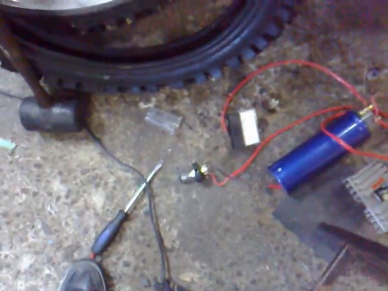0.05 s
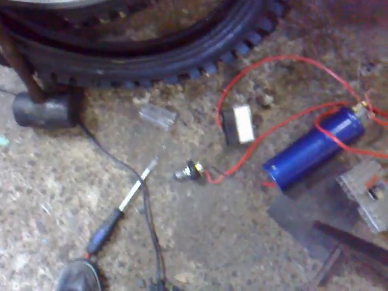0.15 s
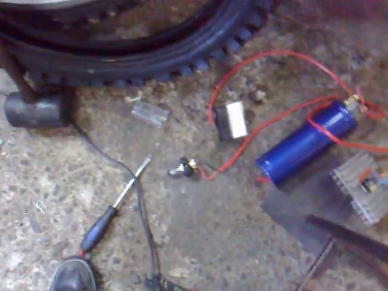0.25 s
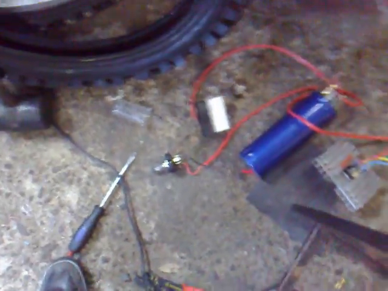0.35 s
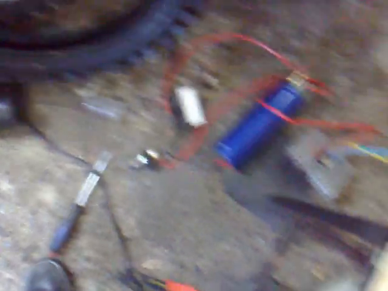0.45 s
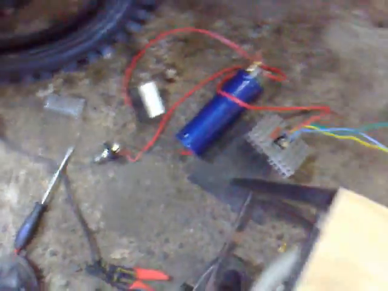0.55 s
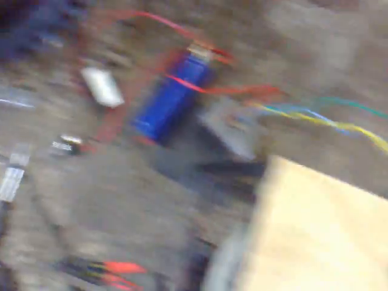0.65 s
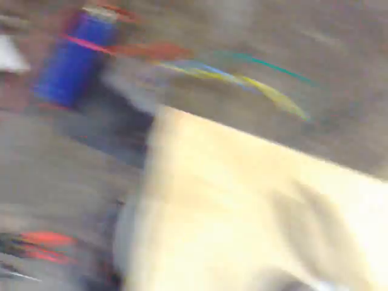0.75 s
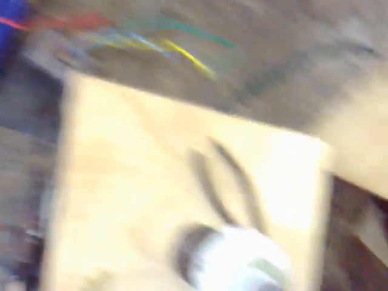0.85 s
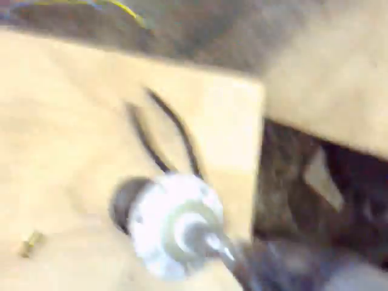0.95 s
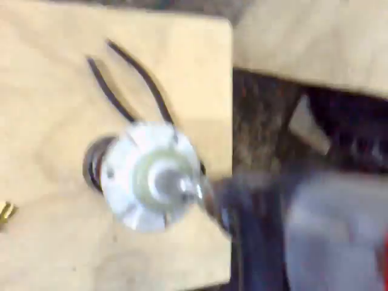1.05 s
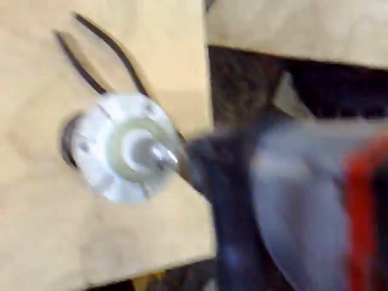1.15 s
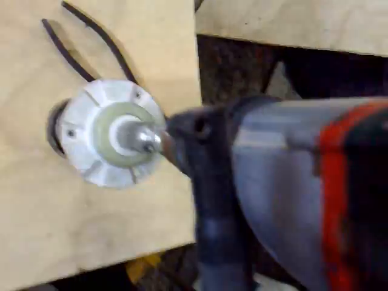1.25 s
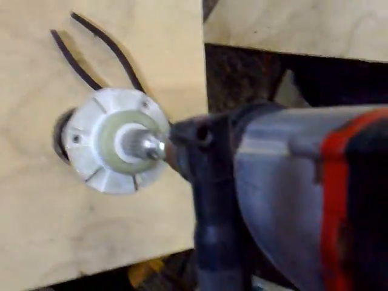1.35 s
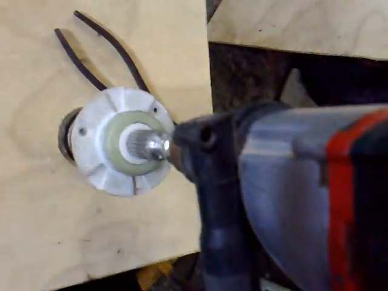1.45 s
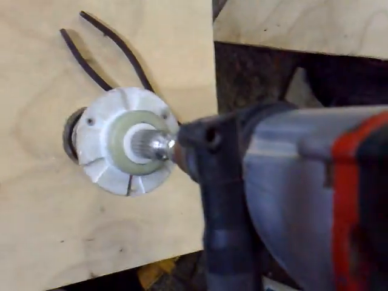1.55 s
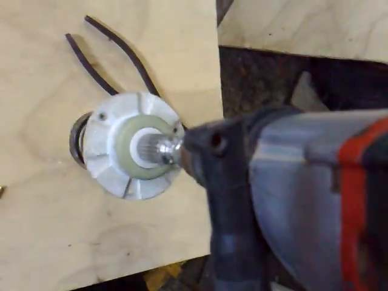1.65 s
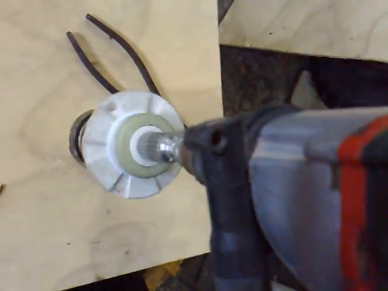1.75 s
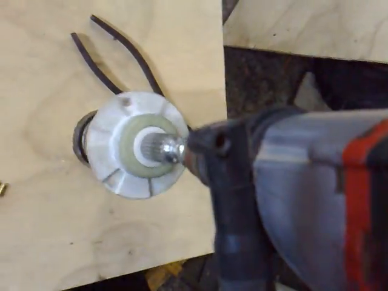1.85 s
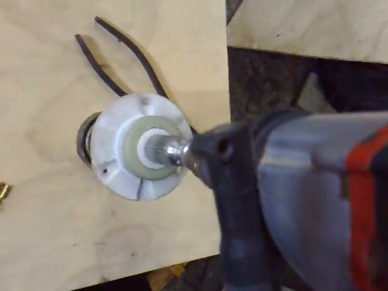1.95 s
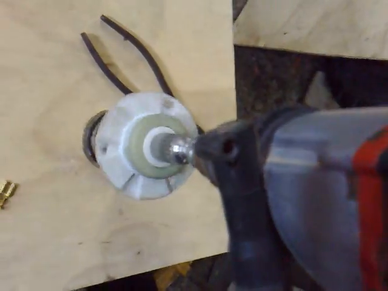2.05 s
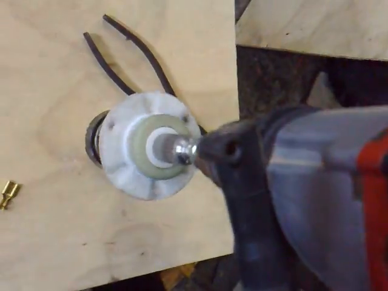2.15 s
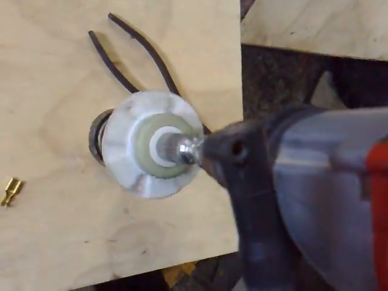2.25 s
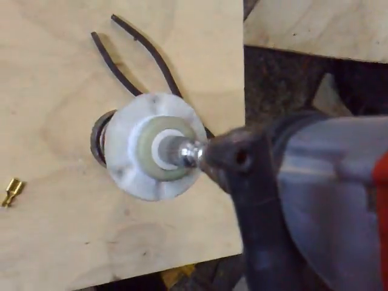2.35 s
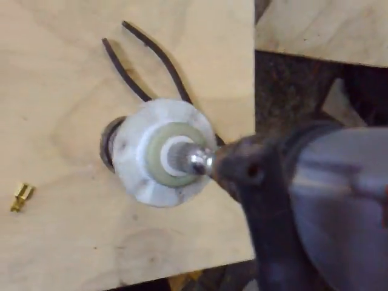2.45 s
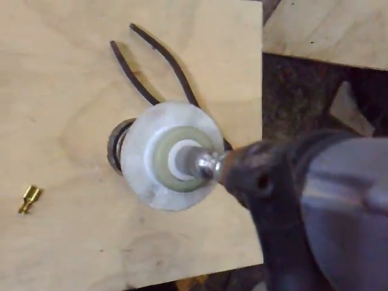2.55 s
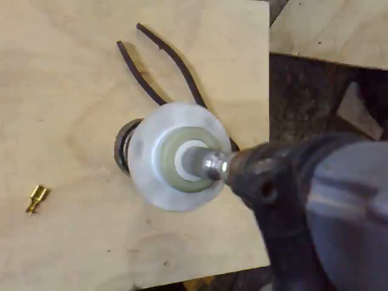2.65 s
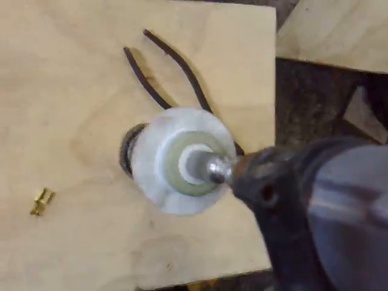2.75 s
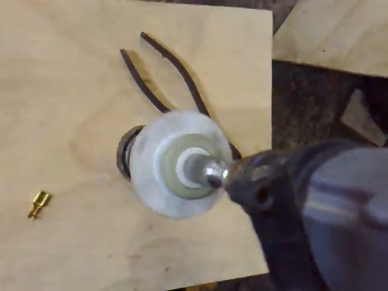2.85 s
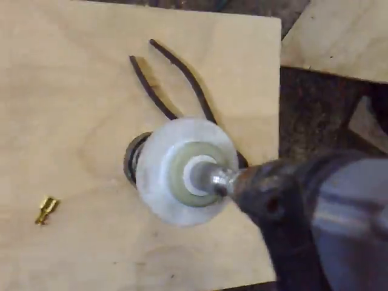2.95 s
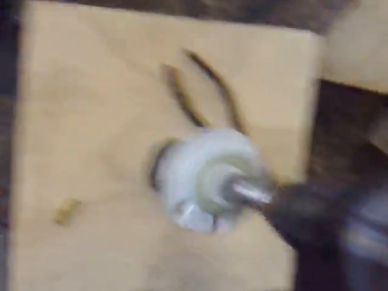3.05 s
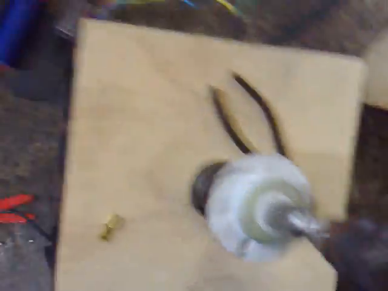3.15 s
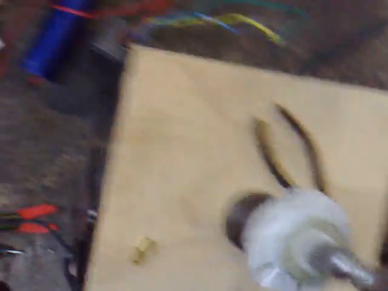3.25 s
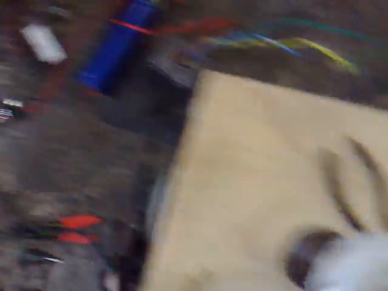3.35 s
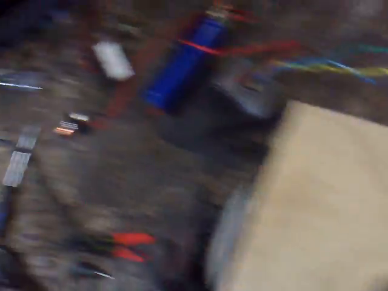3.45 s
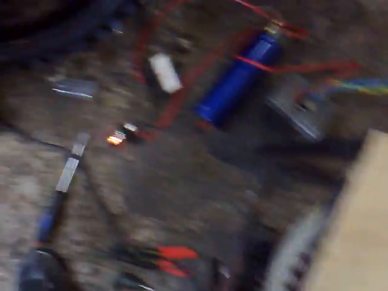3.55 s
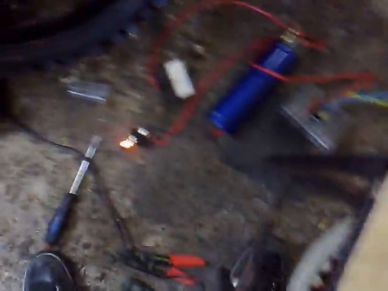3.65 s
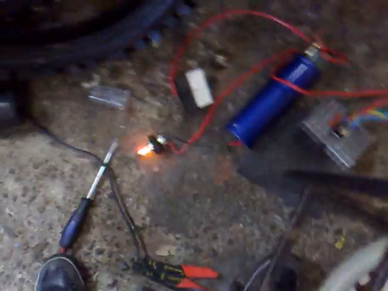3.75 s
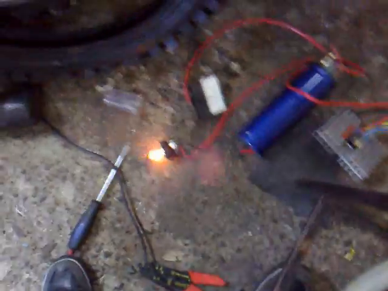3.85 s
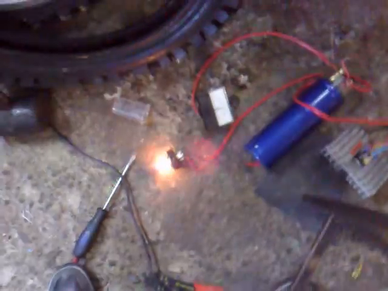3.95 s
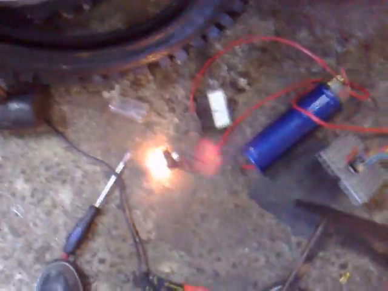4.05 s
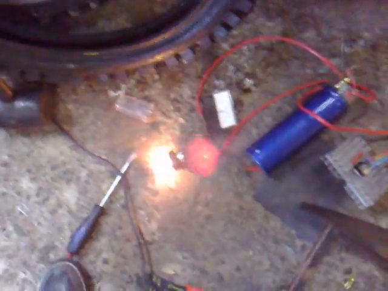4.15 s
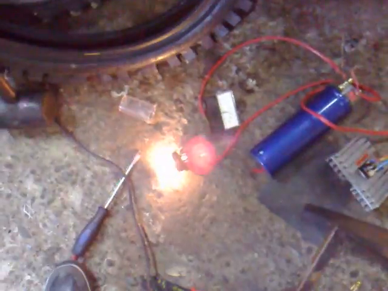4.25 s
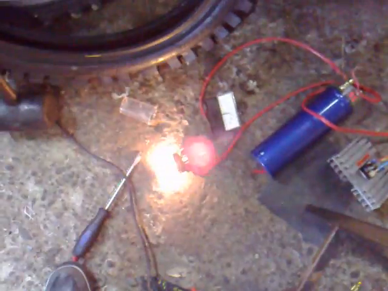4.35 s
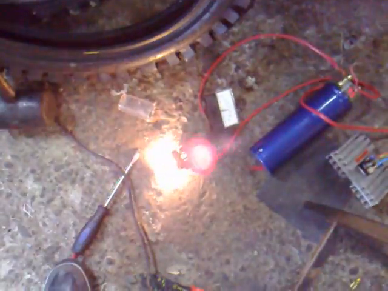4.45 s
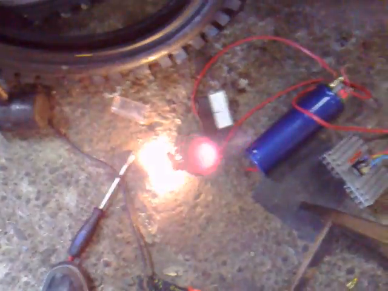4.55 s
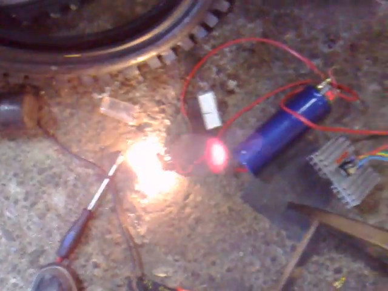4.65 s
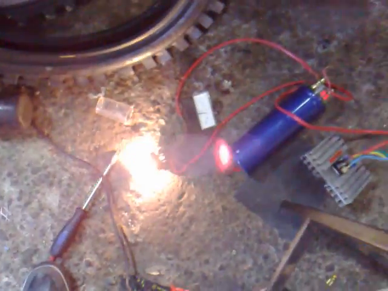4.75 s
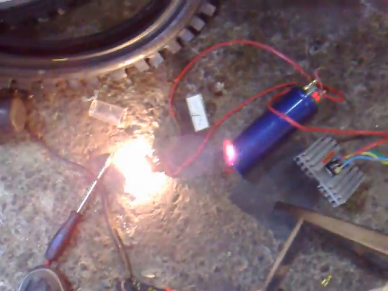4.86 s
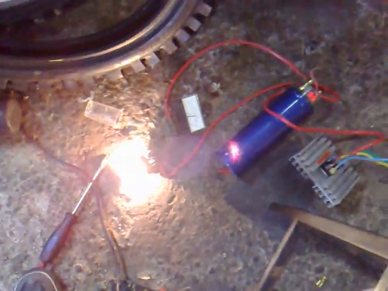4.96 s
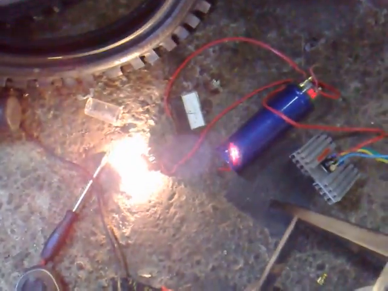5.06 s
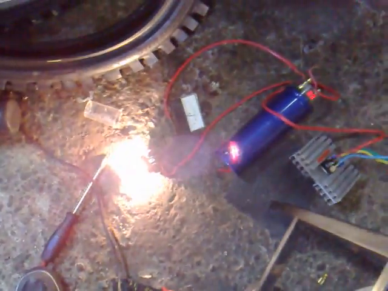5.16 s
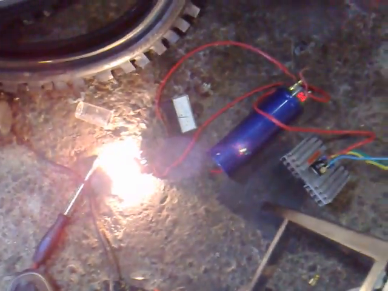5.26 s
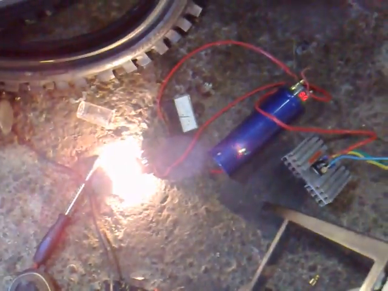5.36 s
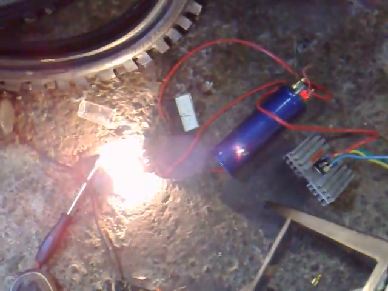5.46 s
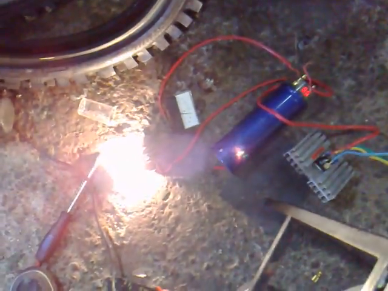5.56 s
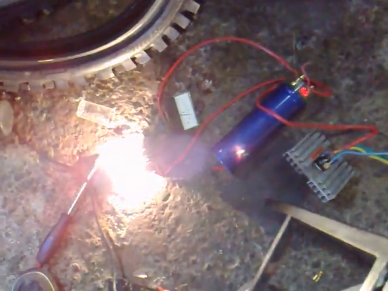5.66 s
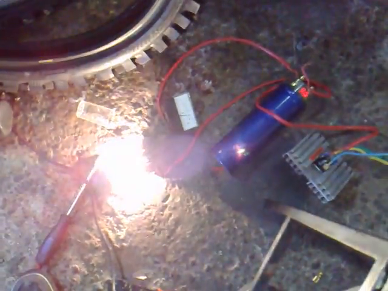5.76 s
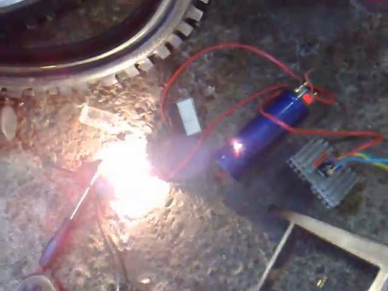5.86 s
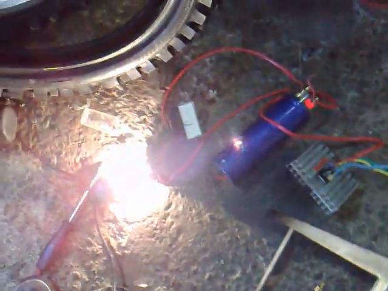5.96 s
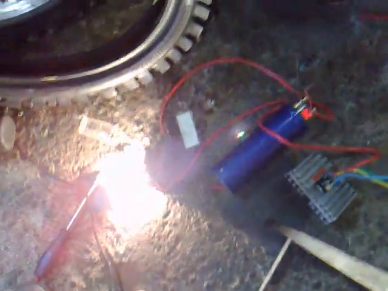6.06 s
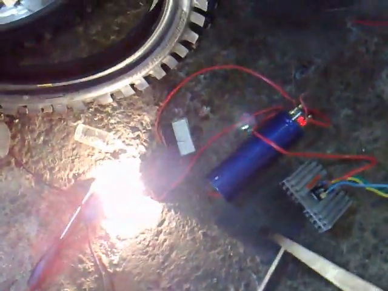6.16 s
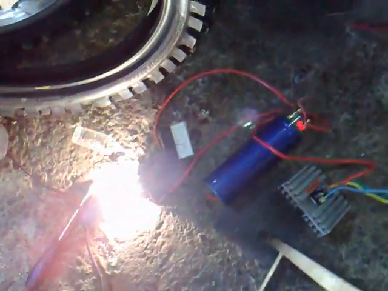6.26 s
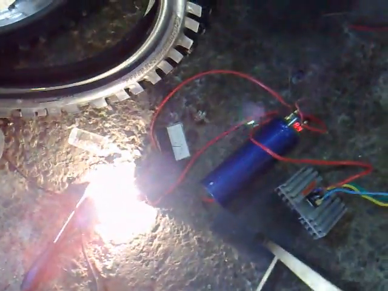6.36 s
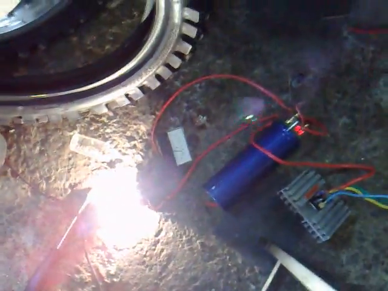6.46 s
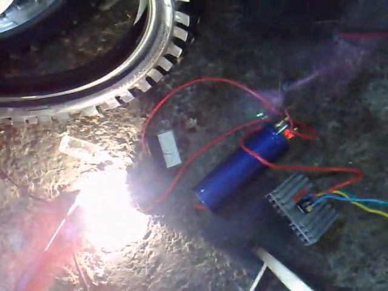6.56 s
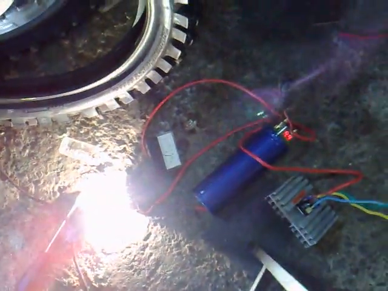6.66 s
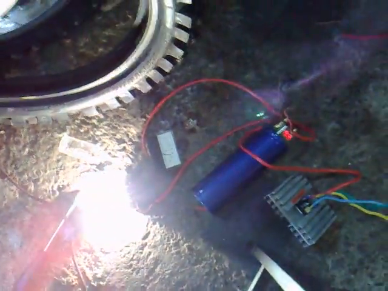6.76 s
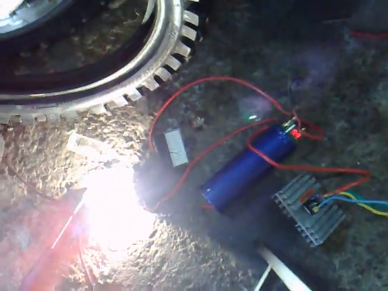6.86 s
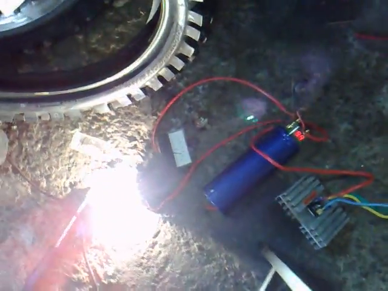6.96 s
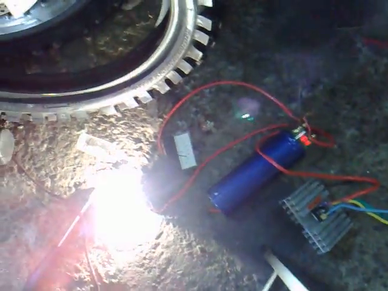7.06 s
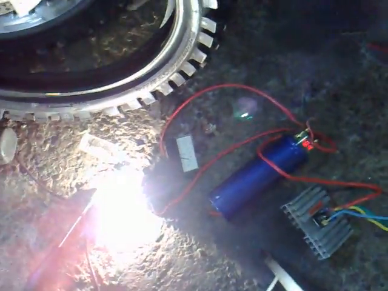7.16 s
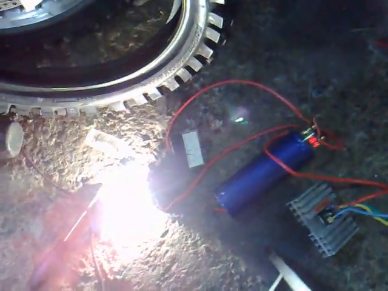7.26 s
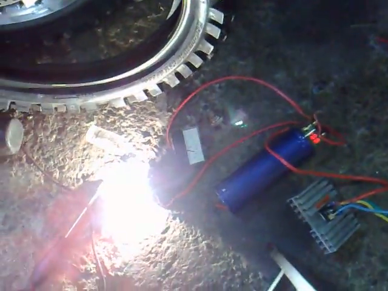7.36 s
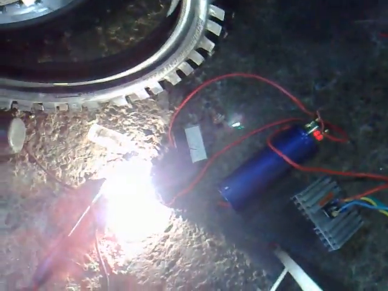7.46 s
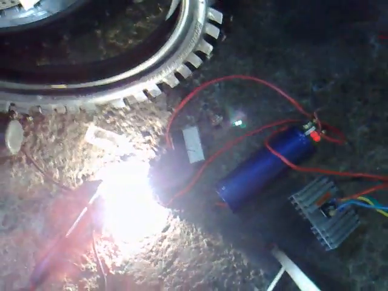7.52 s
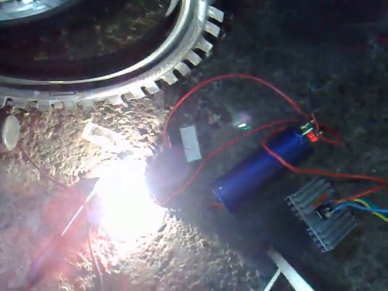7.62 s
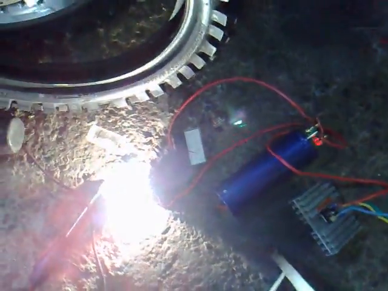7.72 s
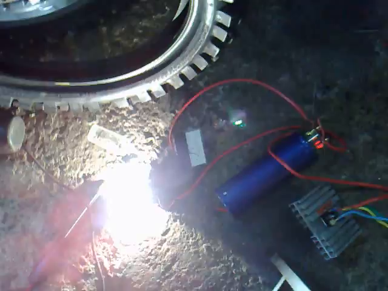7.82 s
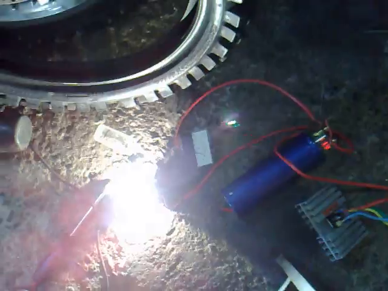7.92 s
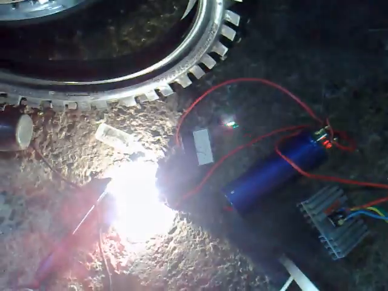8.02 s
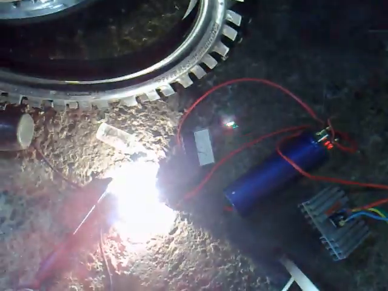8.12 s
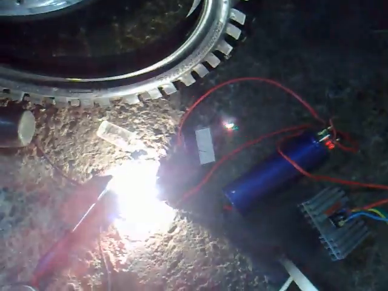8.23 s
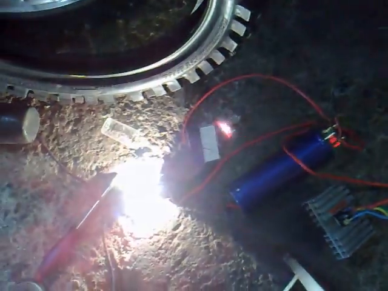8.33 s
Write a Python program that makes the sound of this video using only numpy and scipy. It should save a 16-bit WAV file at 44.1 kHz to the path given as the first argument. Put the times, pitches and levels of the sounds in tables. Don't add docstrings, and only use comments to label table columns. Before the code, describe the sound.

Quiet workshop noise and faint low handling rumble open the scene. From about 0.4 s a stalled mains drill gives a brief buzz, then from 0.5 s a dense rattle of ticks, about a hundred a second in uneven strong and weak pairs, over electrical hum, growing brighter until a tiny gap near 1.35 s. At 1.6 s the rotor breaks loose: a rough, throbbing grind, with irregular hard gear knocks until 2.6 s. Around 2.5 to 3 s it surges into a loud, bright, close gear whine. From 3.3 to 3.7 s, after a dull grip thump, the microphone turns away and the noise falls back and thins. The whine steps up slightly near 3.5 and 4.5 s, then climbs clearly at 5.5 s to a steady, piercing pitch with small wavering dips and mains-rate roughness. Near 7.9 s it starts falling, ending still running at 8.4 s.

```python
import sys
import numpy as np
from scipy import signal
from scipy.fft import rfft, irfft, next_fast_len
from scipy.io import wavfile
from scipy.ndimage import uniform_filter1d

SR = 44100
rng = np.random.default_rng(int(sys.argv[2]) if len(sys.argv) > 2 else 0)


def attenuation_scalar(level_db):
    decades = np.asarray(level_db, float) / 20
    return 10 ** decades


def log_audio(samples):
    frames = np.atleast_2d(samples).T
    limited = np.clip(frames, -1, 1)
    pcm = np.round(limited * 32767).astype(np.int16)
    wavfile.write(sys.argv[1], SR, pcm)


N = 369999
TIME = np.arange(N) / SR

MAINS_HZ, STRONG_KICK_S = 50.13, 1.4025
TURN_AWAY_S = 3.31, 3.7
ROOM_DB, RUMBLE_DB = -63, -62
GRIP_NEAR_DB, GRIP_AWAY_DB = -36.5, -49
BODY_DB, BODY_SINKS, BODY_LEAST_DB = -7, 0.53, -8
BUZZ_DB, BUZZ_FOLLOWS, STALL_ENDS_S = -45, 0.34, 1.63
WEAK_SPREAD_DB, PAUSE_DB = 2.0, -6
ROTOR_LAG_S, BIND_S = .155, .06
TEETH_PER_CHUCK_TURN = 33
CRAWL_ENDS_HZ = 400
EFFORT_DB, CURRENT_LAG_S = 80, .5
TOOTH_LOAD_DB = 3
COWL_HZ, COWL_WIDTH_HZ, COWL_LIFT_DB = 11500, 1500, 12

# (frequency [Hz], density [dB per Hz])
ROOM = [(15, -35), (25, -27), (45, -10), (70, -23), (84, -21), (108, 2.5), (161, -5), (206, 0), (223, -15),
        (363, -30), (503, -11), (714, -14.5), (16000, -31)]
# (frequency [Hz], density [dB per Hz])
RUMBLE = [(15, -42), (25, 1), (70, -7.5), (97, 3.5), (124, -6.5), (279, -5), (400, -17), (520, -7),
          (880, -120)]
# (time [s], peak [dB])
THUMPS = [(0.578, -41), (3.209, -36), (4.439, -35), (5.561, -40), (6.149, -42), (6.849, -36)]
# (time [s], tick above 7 kHz [dB], weak half-wave [dB], fifth hum line [dB])
STALL = [(.2, -75, 3, -90), (.24, -77, -6, -60), (.44, -50, -11, -54), (.52, -47.5, -9, -41.5),
         (.63, -45.5, -38, -40.5), (.8, -38.5, -10.5, -42), (1.03, -34.5, -21, -54),
         (1.09, -33.5, -10, -56), (1.53, -24.5, -9, -46.5)]
# (start [s], end [s])
TRIGGER_HELD = [
    (.368, .452),
    (.498, 1.338),
    (1.378, 1.53),
]
# (frequency [Hz], density [dB per Hz])
TICK = [(1500, -32), (2600, -27.5), (3300, -18), (7200, -23), (8300, -18.5), (13000, -15), (14000, -23),
        (16000, -28)]
# (frequency [Hz], width [Hz], gain [dB])
TICK_RINGS = [(4400, 800, 6), (10000, 700, 5), (12800, 600, 3)]
# (multiple of mains [1], level [dB])
HUM = [(2, -68), (4, -56.5), (6, -67.5), (8, -57), (12, -52), (14, -55.5), (16, -67), (18, -62),
       (20, -58.5)]
# (time [s], gain [dB])
HUM_STAYS = [(1.6, 4.5), (2.9, 1), (3.6, -16), (8.39, -8)]
# (frequency [Hz], density [dB per Hz])
BUZZ = [(250, -30), (450, -3), (600, -3), (1130, -13), (2000, -11), (3500, -9), (5000, -13), (6500, -20),
        (16000, -24)]
# (frequency [Hz], width [Hz], gain [dB])
BUZZ_RINGS = [(2000, 200, 6), (3000, 400, 5), (4500, 600, 6)]
# (time [s], extra path [ms], level [dB])
BENCH_ECHO = [(.6, .78, -12), (1.0, .68, -12), (1.1, .707, -7), (1.55, .707, -7), (1.6, .98, -14),
              (2.4, .98, -18), (2.6, .563, -8), (3.3, .563, -8), (3.7, .64, -22)]
# (time [s], level in 1-3 kHz [dB])
GRIND = [(1.56, -46), (1.6, -32), (1.69, -19.5), (2.04, -19), (2.15, -16), (2.38, -11.5), (2.48, -16),
         (2.75, -9), (2.95, -12.5), (3.57, -15.5), (3.66, -19), (4.5, -19.5), (4.66, -18.5), (5.36, -19),
         (5.61, -19), (7.5, -20), (7.95, -21.5), (8.39, -19.5)]
# (frequency [Hz], density [dB per Hz])
NEAR = [(150, -60), (250, -30), (480, -11.5), (640, -15), (1120, -5), (2000, -2), (4000, -4), (6000, -7),
        (8400, -18), (11000, -18), (13000, -23.5), (16000, -32)]
# (frequency [Hz], density [dB per Hz])
AWAY = [(150, -40), (250, -29.5), (520, -18), (620, -8), (1100, -8.5), (2000, 2), (4500, -2.5),
        (6500, -4.5), (9000, -6), (11500, -4.5), (13500, -13), (16000, -21)]
# (frequency [Hz], width [Hz], gain [dB])
NEAR_RINGS = [(1500, 250, 3), (2000, 250, 5), (2450, 250, -7), (3150, 350, 4), (3650, 300, -5),
              (4100, 400, 6), (4700, 300, -2), (5300, 600, 4), (6500, 400, -3), (7000, 400, 2),
              (10650, 600, 3)]
# (frequency [Hz], width [Hz], gain [dB])
AWAY_RINGS = [(2050, 250, 5), (2450, 250, -3), (3550, 300, -3), (4050, 350, 4), (4750, 300, 5),
              (6700, 400, -3), (10200, 700, 3)]
# (tooth rate [Hz], under 1 kHz [dB], 3-7 kHz [dB], over 7 kHz [dB])
NEAR_TILT = [(130, -11.5, -6.5, -18), (300, -11.5, -1, -9), (432, -18.5, -2, -4.5), (790, -26, 3, -0.5)]
# (tooth rate [Hz], under 1 kHz [dB], 3-7 kHz [dB], over 7 kHz [dB])
AWAY_TILT = [(750, -12, 2, -6.5), (844, -14, 2, -4), (1054, -13.5, 3, -3), (1530, -13, 1, -1.5)]
# (tooth rate [Hz], share [0-1])
THROB = [(130, .8), (220, .6), (290, .35), (600, .08), (750, .13)]
# (time [s], tooth rate [Hz])
TRIGGER = [(1.588, 116), (2.104, 300), (2.536, 281), (2.852, 742), (3.464, 790), (3.526, 933), (4.04, 975),
           (4.376, 955), (4.542, 1042), (5.074, 994), (5.134, 1061), (5.346, 1057), (5.472, 1471),
           (6.564, 1445), (7.256, 1369), (7.318, 1422), (7.85, 1437), (7.93, 713)]
# (time [s], sag [Hz])
BINDS = [(3.808, 24), (5.64, 16), (6.248, 33), (6.448, 14), (7.04, 15), (7.568, 18)]
# (tooth rate [Hz], rotor tones [dB], cowl whine [dB])
NEAR_WHINE = [(400, -65, -70), (704, -43, -45), (720, -67, -31.5)]
# (tooth rate [Hz], rotor tones [dB], cowl whine [dB])
AWAY_WHINE = [(800, -52, -55), (920, -44, -38), (1040, -40, -39), (1200, -38, -40), (1430, -33, -33.5)]
# (multiple [1], level [dB], extra heard close [dB], flicker [dB])
MESH = [(1, -31, -9, 2.0), (2, -32.5, 13, 2.2), (3, -41, 2, 2.5), (1.422, -36.5, -1, 3.0),
        (.422, -41, -8, 1.5)]
# (tooth rate [Hz], gain [dB])
MESH_GROWS = [(130, -28.5), (320, -22.5), (410, -11), (480, -2.5), (1430, 1)]
# (frequency [Hz], width [Hz], gain [dB])
MESH_RINGS = [(333, 166, -24), (596, 40, 5), (814, 200, -1.5), (967, 100, -10.5), (1012, 46, 7.5),
              (1410, 67, 3), (2057, 140, 3.5), (2370, 215, -2), (2590, 460, 4.5), (4370, 520, 8.5)]
# (multiple of tooth rate [1], level [dB])
CRAWL_TONES = [(1.29, -52), (1.61, -51), (2.11, -49), (2.31, -49)]
# (multiple of tooth rate [1], level re rotor tones [dB])
SIDE_TONES = [(.578, -10), (.844, -13), (1.333, -5), (4.0, -8), (4.52, -6), (5.0, -4), (5.52, -7),
              (.333, -20.5), (.5, -17.5), (.667, -17)]
# (multiple of tooth rate [1], level re cowl whine [dB])
UPPER = [(6, -7), (7, -6), (8, 0), (9, -2), (10, -3), (11.1, -4), (12, 0), (15.8, 0)]
# (time [s], peak [dB])
KNOCKS = [(1.623, -16), (1.704, -10), (1.75, -16), (1.7714, -9), (1.8036, -9), (1.8227, -5), (1.8427, -6),
          (1.8632, -9), (1.8885, -2), (1.9221, -0.5), (1.9653, -4), (1.984, -11), (2.0034, -17),
          (2.0204, -6.5), (2.041, -5), (2.0644, -4), (2.089, -12), (2.122, -12), (2.134, -6), (2.151, -8),
          (2.161, -5), (2.171, -0.5), (2.2, -3), (2.2588, 0.5), (2.2988, 0), (2.3384, -3), (2.4487, 0),
          (2.516, -5), (2.5637, 0), (2.605, -3)]


def rms_one(x):
    return x / np.sqrt(np.mean(x ** 2) + 1e-20)


def in_time(rows):
    s, *columns = np.transpose(rows)
    return [np.interp(TIME, s, column) for column in columns]


def turned():
    return np.interp(TIME, TURN_AWAY_S, [0, 1])


def drift(rate):
    r = np.exp(-16 * np.pi * rate / SR)
    white = rng.standard_normal(N // 8 + 6002)
    slow = signal.lfilter([1], [1, -2 * r, r * r], white)[6000:]
    return np.interp(np.arange(N) / 8, np.arange(len(slow)), rms_one(slow))


def resonance(hz, rings):
    return sum(db / (1 + (2 * (hz - ring_hz) / width) ** 2) for ring_hz, width, db in rings)


def colour(x, spectrum, rings=(), band=(0, 1e6)):
    size = next_fast_len(N)
    hz = np.arange(size // 2 + 1) * SR / size + 1
    curve_hz, curve_db = np.transpose(spectrum)
    db = np.interp(np.log(hz), np.log(curve_hz), curve_db) + resonance(hz, rings)
    keep = 1 / np.sqrt((1 + (band[0] / hz) ** 10) * (1 + (hz / band[1]) ** 10))
    return rms_one(irfft(rfft(x, size) * attenuation_scalar(db) * keep, size)[:N])


def bursts(strikes, rise_s, fall_s):
    age = np.arange(int(12 * fall_s * SR)) / SR
    shape = (1 - np.exp(-age / rise_s)) * np.exp(-age / fall_s)
    return signal.fftconvolve(strikes, shape / shape.max())[:N]


def swells(strikes, peak_s):
    age = np.arange(int(8 * peak_s * SR)) / SR / peak_s
    return signal.fftconvolve(strikes, (age * np.exp(1 - age)) ** 6)[:N]


def blows(events, trim_db):
    strikes = np.zeros(N)
    for s, db in events:
        strikes[round(s * SR)] = attenuation_scalar(db + trim_db)
    return strikes


def half_waves(spread_db):
    count = np.floor((TIME - STRONG_KICK_S) * 2 * MAINS_HZ)
    fires = np.diff(count, prepend=count[0]) > 0
    return fires * attenuation_scalar(spread_db * rng.standard_normal(N)), count % 2


def room():
    return attenuation_scalar(ROOM_DB) * colour(rng.standard_normal(N), ROOM)


def handling():
    thump_shape = bursts(blows(THUMPS, -13), rise_s=0.0049, fall_s=0.02)
    thumps = thump_shape * colour(rng.standard_normal(N), RUMBLE, band=(60, 380))
    away = turned()
    shake_db = in_time(GRIND)[0] + (1 - away) * GRIP_NEAR_DB + away * GRIP_AWAY_DB
    level = np.hypot(attenuation_scalar(RUMBLE_DB), attenuation_scalar(shake_db)) * attenuation_scalar(2.0 * drift(1.3))
    return thumps + level * colour(rng.standard_normal(N), RUMBLE)


def kicks(held, tick_db, weak_db):
    body_db = np.maximum(BODY_DB - BODY_SINKS * (tick_db + 35.5), BODY_LEAST_DB)
    weak_db = np.minimum(weak_db + WEAK_SPREAD_DB * drift(6.4), 0)
    strikes, weak = half_waves(spread_db=1.1)
    strikes = strikes * held * attenuation_scalar(tick_db + weak * weak_db)
    shape = swells(strikes, peak_s=.0019) + attenuation_scalar(-18) * bursts(strikes, rise_s=.002, fall_s=.006)
    white = rng.standard_normal(N)
    bright = colour(white, TICK, TICK_RINGS, (7000, 1e6))
    body = colour(white, TICK, TICK_RINGS, (0, 7000))
    return attenuation_scalar(11.5) * shape * (bright + attenuation_scalar(body_db) * body)


def hum(stalled, fifth_db):
    fifth_db = fifth_db + 1.3 * drift(4.8) * (0.5 + 2 * (TIME > 1.))
    out = stalled * attenuation_scalar(fifth_db) * np.sin(20 * np.pi * MAINS_HZ * TIME)
    swell = np.clip((TIME - .3) / 0.36, 0, 1) * attenuation_scalar(in_time([(1.53, 0)] + HUM_STAYS)[0])
    for multiple, db in HUM:
        phase = multiple * MAINS_HZ * TIME + rng.random()
        out = out + swell * attenuation_scalar(db + 1.3 * drift(3)) * np.sin(2 * np.pi * phase)
    return np.sqrt(2) * out


def buzz(stalled, tick_db):
    db = BUZZ_DB + BUZZ_FOLLOWS * (tick_db + 41.5) - 25 * np.clip((.4 - TIME) / 0.27, 0, 1)
    return stalled * attenuation_scalar(db) * colour(rng.standard_normal(N), BUZZ, BUZZ_RINGS)


def stall():
    tick_db, weak_db, fifth_db = in_time(STALL)
    held = sum((TIME > start) * (TIME < end) for start, end in TRIGGER_HELD)
    in_use = (TIME > TRIGGER_HELD[0][0]) * (TIME < TRIGGER_HELD[-1][1])
    paused = uniform_filter1d(in_use * (1. - held), size=600)
    stalled = np.clip((STALL_ENDS_S - TIME) / 0.019, 0, 1) * attenuation_scalar(PAUSE_DB * paused)
    return kicks(held, tick_db, weak_db) + hum(stalled, fifth_db) + buzz(stalled, tick_db)


def bench(x):
    path_ms, echo_db = in_time(BENCH_ECHO)
    low_pass = signal.butter(2, 5500, fs=SR, output="sos")
    treble = x - signal.sosfiltfilt(low_pass, x)
    echo = np.interp(np.arange(N) - path_ms * SR / 1000, np.arange(N), treble)
    return x + attenuation_scalar(echo_db) * echo


def rotor():
    wanted, = in_time(TRIGGER)
    r = np.exp(-1 / (ROTOR_LAG_S * SR))
    hz = wanted[0] + signal.lfilter([1 - r], [1, -r], wanted - wanted[0])
    sag = sum(sag_hz * np.exp(-((TIME - s) / BIND_S) ** 2) for s, sag_hz in BINDS)
    return hz - sag, wanted / hz - 1


def at_speed(law, tooth_hz):
    hz, *columns = np.transpose(law)
    return [np.interp(tooth_hz, hz, column) for column in columns]


def by_speed(near, away, tooth_hz):
    share = turned()
    pairs = zip(at_speed(near, tooth_hz), at_speed(away, tooth_hz))
    return [(1 - share) * a + share * b for a, b in pairs]


def grind():
    level_db, = in_time(GRIND)
    tooth_hz, _ = rotor()
    low_db, mid_db, high_db = by_speed(NEAR_TILT, AWAY_TILT, tooth_hz)
    strikes, _ = half_waves(spread_db=1.5)
    throb = np.clip(at_speed(THROB, tooth_hz)[0], 0, 1)
    pulse = 1 - throb + throb * rms_one(bursts(strikes, rise_s=0.0051, fall_s=0.0017))
    away = turned()
    bands = [((0, 1000), low_db), ((1000, 3000), 0), ((3000, 7000), mid_db), ((7000, 1e6), high_db)]
    noise = 0
    for band, rel_db in bands:
        white = rng.standard_normal(N)
        casing = (1 - away) * colour(white, NEAR, NEAR_RINGS, band)
        casing = casing + away * colour(white, AWAY, AWAY_RINGS, band)
        noise = noise + attenuation_scalar(rel_db + 0.84 * drift(15)) * casing
    chuck_turns = np.cumsum(tooth_hz) / SR / TEETH_PER_CHUCK_TURN
    run_out_db = 0.27 * np.sin(2 * np.pi * chuck_turns)
    teeth_db = 0.63 * drift(31) + 0.99 * drift(220)
    return (TIME > GRIND[0][0]) * attenuation_scalar(level_db - 4.0 + run_out_db + teeth_db) * pulse * noise


def tone(turns, multiple, db, flicker_db, rate=15.7):
    level = np.sqrt(2) * attenuation_scalar(db + flicker_db * drift(rate))
    return level * np.sin(2 * np.pi * (multiple * turns + rng.random()))


def mesh(tooth_hz, effort, turns, mains):
    close = 1 - turned()
    load = np.clip((tooth_hz - 800) / 600, 0, 1) * np.clip(1 + 12 * effort, 0, 1)
    ripple = load * (1.23 * mains + 0.25 * (2 * mains ** 2 - 1))
    load_db = TOOTH_LOAD_DB * np.minimum(abs(effort), .4) * (1 - close)
    grows_db, = at_speed(MESH_GROWS, tooth_hz)
    out = 0
    for multiple, db, close_db, flicker_db in MESH:
        box_db = resonance(multiple * tooth_hz, MESH_RINGS) * (1 - close * (multiple == 2))
        db = db + close * close_db + box_db + load_db * (multiple < 3) + grows_db
        out = out + tone(turns, multiple, db, flicker_db, rate=6.8) * (1 + ripple * (multiple == 2))
    return out


def cowl_whine(tooth_hz, effort, turns, mains, cowl_db):
    a = 1 / (CURRENT_LAG_S * SR)
    overcurrent = signal.lfilter([a], [1, a - 1], np.clip(effort, -.1, .3))
    cowl_db = cowl_db + EFFORT_DB * overcurrent * (TIME > TURN_AWAY_S[1])
    out = 0
    for multiple, db in UPPER:
        hz = multiple * tooth_hz
        lift_db = COWL_LIFT_DB / (1 + ((hz - COWL_HZ) / COWL_WIDTH_HZ) ** 2)
        lift_db = lift_db - 9 * np.clip(hz / 1000 - 13.3, 0, 5)
        order_db = cowl_db + db - COWL_LIFT_DB + lift_db
        out = out + tone(turns, multiple, order_db, flicker_db=1.8) * (1 + 1.4 * mains)
    return out


def whine():
    tooth_hz, effort = rotor()
    rotor_db, cowl_db = by_speed(NEAR_WHINE, AWAY_WHINE, tooth_hz)
    turns = np.cumsum(tooth_hz * (1 + .0015 * drift(25))) / SR
    mains = np.cos(4 * np.pi * MAINS_HZ * (TIME - STRONG_KICK_S))
    out = mesh(tooth_hz, effort, turns, mains)
    slack = np.clip((CRAWL_ENDS_HZ - tooth_hz) / 40, 0, 1) * np.clip((tooth_hz - 130) / 90, 0, 1)
    for multiple, db in CRAWL_TONES:
        out = out + slack * tone(turns, multiple, db, flicker_db=4.5, rate=6.7)
    for multiple, db in SIDE_TONES:
        out = out + tone(turns, multiple, rotor_db + db, flicker_db=3.8)
    out = out + cowl_whine(tooth_hz, effort, turns, mains, cowl_db)
    return (TIME > TRIGGER[0][0]) * out


def knocks():
    shape = swells(blows(KNOCKS, -8.5), peak_s=0.003)
    return shape * colour(rng.standard_normal(N), NEAR, NEAR_RINGS, (1800, 9000))


def scene():
    drill = bench(stall() + grind() + knocks())
    return np.tile(room() + handling() + drill + whine(), (2, 1))


def band_limit(x):
    return signal.sosfilt(signal.butter(12, 16990, fs=SR, output="sos"), x)


def record(dry):
    rounded = 1.004 * np.tanh(dry / 0.96)
    top_cut = signal.ellip(10, .3, 60, 15750, fs=SR, output="sos")
    return band_limit(signal.sosfilt(top_cut, rounded))


dry = scene()
out = record(dry)
log_audio(out)
```